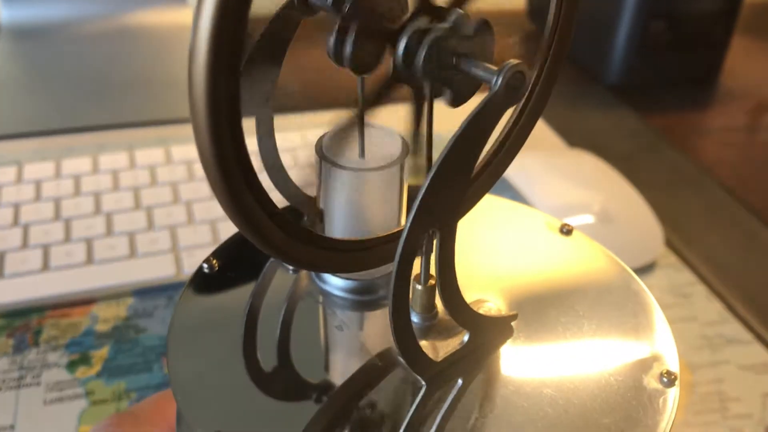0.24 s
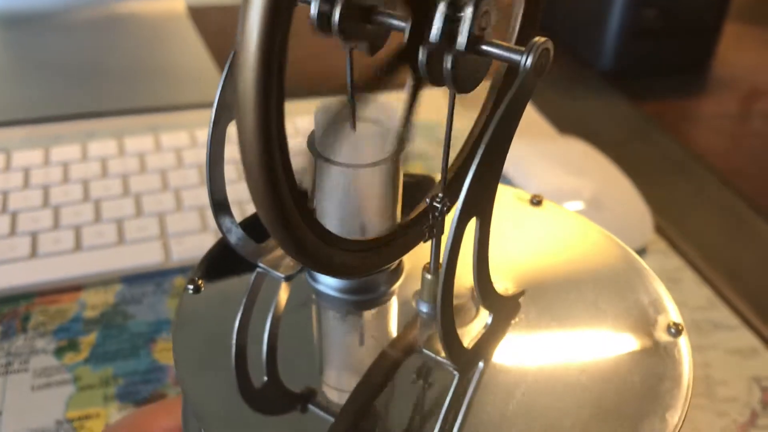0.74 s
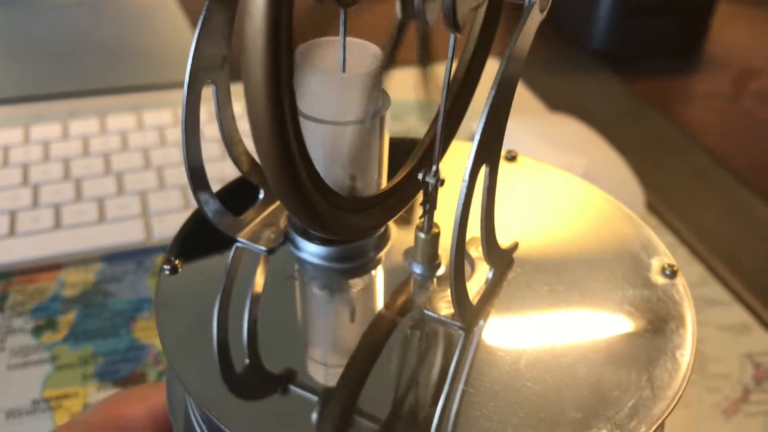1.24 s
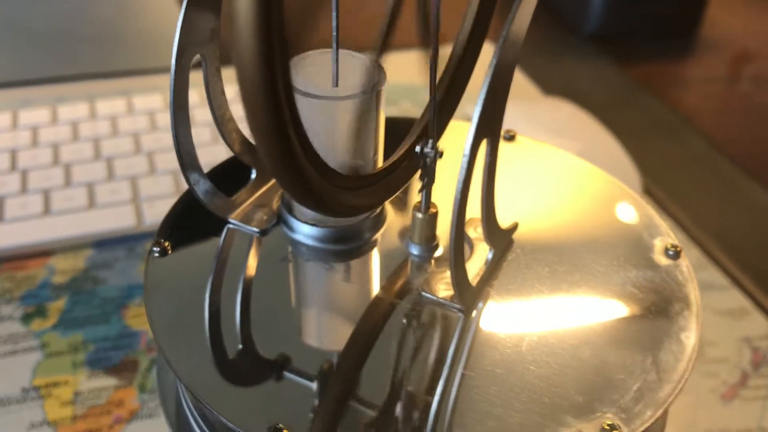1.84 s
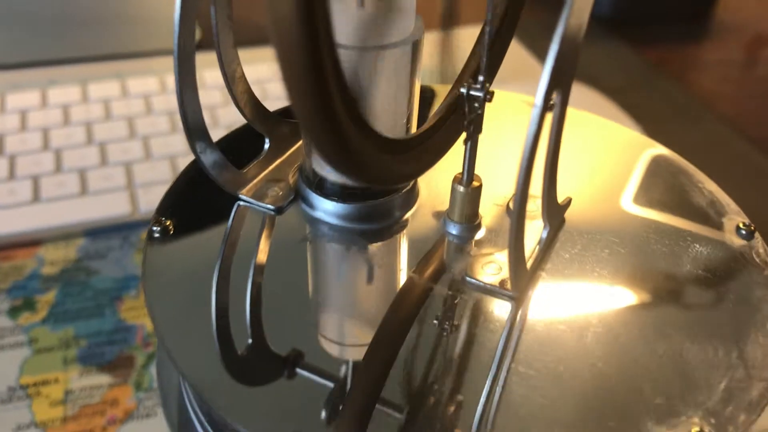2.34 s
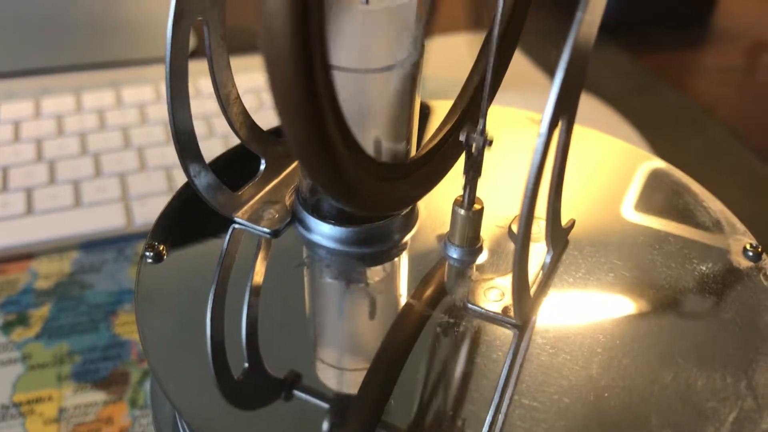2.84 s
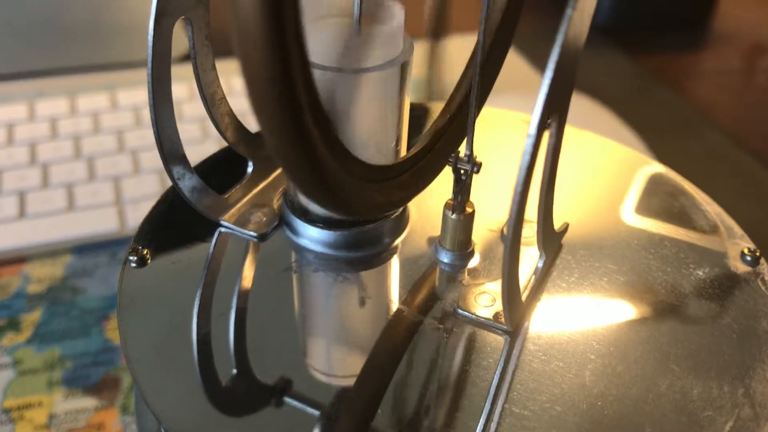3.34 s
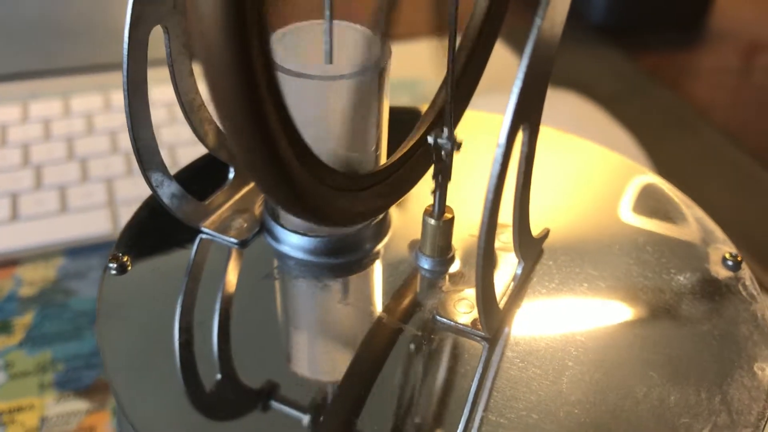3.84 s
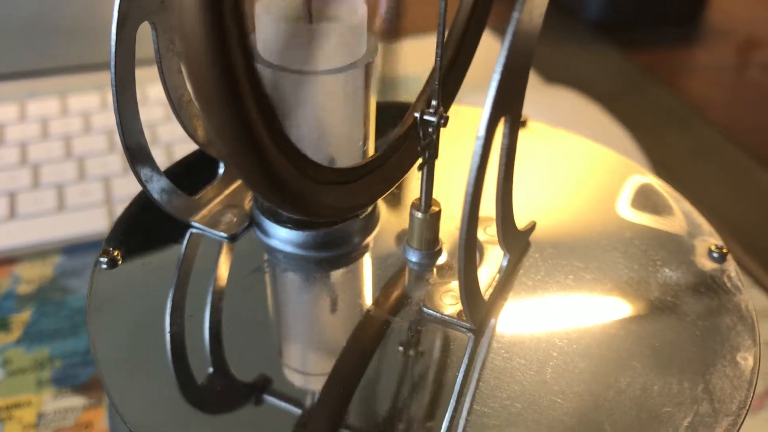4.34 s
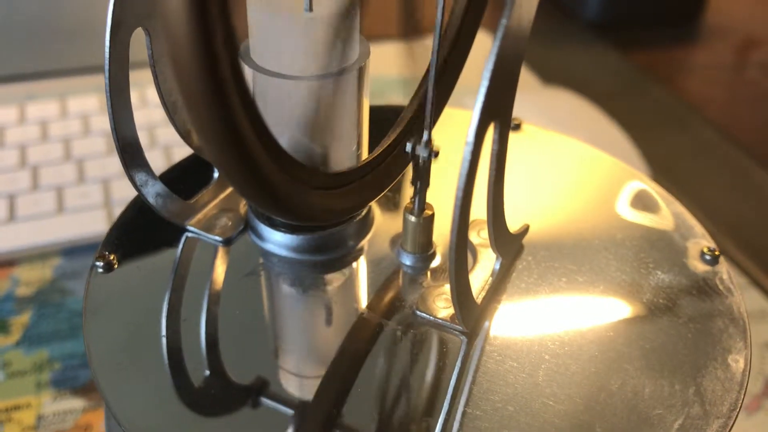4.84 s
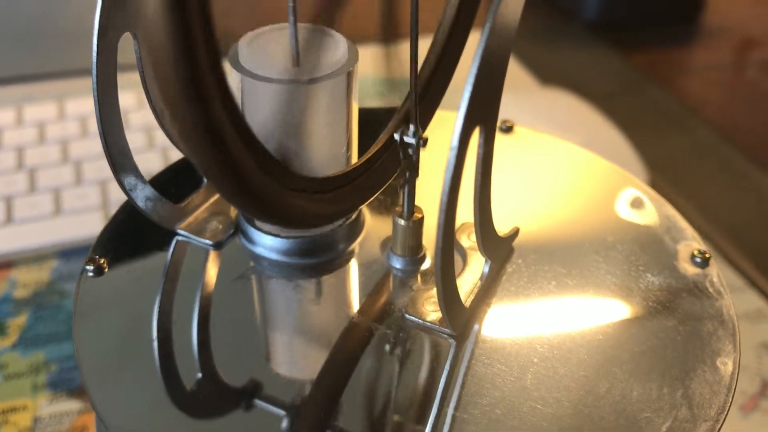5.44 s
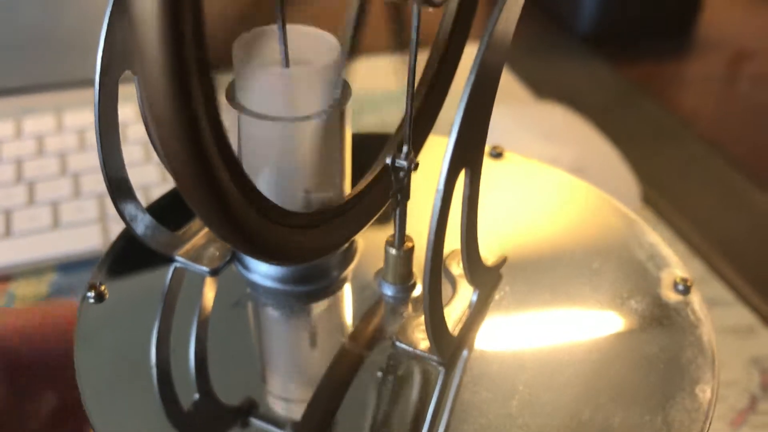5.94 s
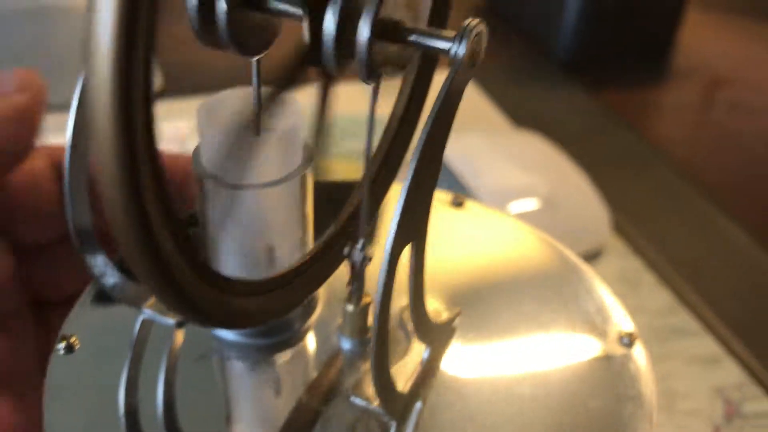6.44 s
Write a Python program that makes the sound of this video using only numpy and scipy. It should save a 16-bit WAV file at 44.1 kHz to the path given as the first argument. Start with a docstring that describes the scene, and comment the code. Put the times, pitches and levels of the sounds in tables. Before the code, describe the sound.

Steady, quick mechanical clicking from a tabletop engine with thin plates and a flywheel, heard close and dry. Each turn pairs a light tick with a louder clack, joined by short piston squeaks, thin rising slide tones and scratchy rubbing that vary from turn to turn. A faint soft tone passes after two seconds; some harder jolts follow. Quiet room hum and hiss lie beneath.

```python
"""A small hot-air engine turns two and a half times a second on a desk, close to a phone microphone.
Each turn: a bright tick, a squeak of the piston in its glass tube, a soft knock, a clack of the crank play.
Contacts are short blows with chatter; rubbing is gritty noise; squeaks and slides are unsteady tones.
Contacts and rubbing ring the thin metal plates and frame. A few dry snaps, a short soft tone just after
two seconds and some harder jolts after three seconds stand out; a faint hum and hiss fill the room."""
import sys
import numpy as np
from scipy import signal
from scipy.fft import rfft, irfft, next_fast_len
from scipy.io import wavfile
from scipy.ndimage import uniform_filter1d, map_coordinates

SR = 44100
rng = np.random.default_rng(int(sys.argv[2]) if len(sys.argv) > 2 else 0)


def natural_amplitude(level_db):
    """Convert a level in decibels to a linear amplitude factor, elementwise."""
    exponent = np.asarray(level_db, float) / 20
    return 10 ** exponent


def waveform_to_disk(signal):
    """Save audio, clipped to [-1, 1], as 16-bit WAV at the path in sys.argv[1]."""
    frames = np.transpose(np.atleast_2d(signal))
    scaled = np.clip(frames, -1, 1) * 32767
    samples = np.round(scaled).astype(np.int16)
    wavfile.write(sys.argv[1], SR, samples)


N = 294131

# The turns of the crank, each timed by the clack that ends it. Each row: clack in seconds, tick level in dB,
# slide level after the tick in dB, clack level in dB, slide level after the clack in dB; all levels relative.
TURNS = [(0.28, -32, -4, -20, -10), (0.687, -32, -1, -24.5, -2), (1.092, -33, -7, -23.5, -7),
         (1.498, -32, 0, -19, -7), (1.901, -32, -6, -20, 0.5), (2.303, -31, 2.5, -24.5, -4.5),
         (2.702, -32, 4.5, -19, 3.5), (3.102, -30, 2.5, -19, 1), (3.5, -29.5, -2, -20, -1.5),
         (3.898, -32.5, 1, -22.5, -3.5), (4.296, -34, 2.5, -23.5, 3), (4.692, -30.5, 5.5, -20, 1),
         (5.088, -32.5, -4, -19.5, 0), (5.483, -29.5, 4.5, -18.5, -2), (5.877, -28, 1, -20.5, -2),
         (6.271, -30.5, -1, -23, .6), (6.663, -33, 4, -22.5, -10)]
TICK_TURN = 0.511  # crank angle in turns after the clack: the rod pin reverses


def unit(x):
    """Scaled to rms 1."""
    return x / np.sqrt(np.mean(x ** 2) + 1e-20)


def along(points, hz):
    """Reads (Hz, value) points on a log frequency axis."""
    f, v = np.transpose(points)
    return np.interp(np.log(hz + 1), np.log(f + 1), v)


def wobble(rate):
    """A smooth random curve, rate knots a second."""
    knots = rng.standard_normal(int(N * rate / SR) + 4)
    return map_coordinates(knots, [np.arange(N) * rate / SR])


def filtered(x, response):
    """Passes x through a complex response of frequency."""
    m = next_fast_len(N + SR // 2)
    spectrum = rfft(x, m) * response(np.fft.rfftfreq(m, 1 / SR))
    return irfft(spectrum, m)[..., :N]


def coloured(x, colour):
    """Passes x through a smooth (Hz, dB) colour."""
    return filtered(x, lambda hz: natural_amplitude(along(colour, hz)))


def patchy(depth_db):
    """White noise whose strength varies in patches of pitch and time."""
    z = signal.stft(rng.standard_normal(N), nperseg=256)[2]
    field = uniform_filter1d(rng.standard_normal(z.shape), size=5, axis=0)
    field = uniform_filter1d(field, size=5, axis=1)
    return signal.istft(z * natural_amplitude(depth_db * unit(field)), nperseg=256)[1][:N]


def at_turn(angle):
    """The moment in each turn when the crank passes an angle."""
    clack_s = np.array(TURNS)[:, 0]
    start = np.r_[2 * clack_s[0] - clack_s[1], clack_s[:-1]]
    return start + angle * (clack_s - start)


def by_turn(table):
    """Columns of a table read at the crank angle, which the clacks mark."""
    s = np.array(TURNS)[:, 0]
    s = np.r_[2 * s[0] - s[1], s, 2 * s[-1] - s[-2]]  # one turn more at either end
    turn = np.interp(np.arange(N) / SR, s, np.arange(len(s))) % 1
    angle, *cols = np.transpose(table)
    return [np.interp(turn, angle, c) for c in cols]


def linkage():
    """All contacts of crank, rods and displacer: blows whose force and surfaces set level and colour."""
    # Colour of each contact. Each row: frequency in Hz, gain in dB.
    clack_colour = [(150, -5.5), (600, -7.5), (2000, -3.5), (4000, -8.5), (9000, 2.5), (15000, -9.5)]
    tick_colour = [(150, -4), (600, -12), (2000, -6.5), (4000, -10.5), (7500, 2.5), (15000, -27.5)]
    knock_colour = [(150, -10.5), (600, 6), (1500, -24.5), (3500, 0.5), (6000, 5), (15000, -2.5)]
    rattle_colour = [(150, 4.5), (600, -3), (2000, -10), (5000, -3.5), (9000, 11.5), (15000, -16)]
    jolt_colour = [(150, -0.5), (600, -2), (900, 5.5), (2000, -3.5), (5000, -11), (9000, 3.5), (15000, -17)]
    snap_colour = [(300, -8), (1500, -13.5), (5000, 1.5), (15000, 5)]
    # Now and then a joint jolts harder. Each row: start in seconds, relative level in dB, treble in dB.
    jolts = [(3.159, -38, 0.5), (3.277, -40.5, 2), (3.559, -38.5, -17), (4.068, -34.5, 0),
             (4.359, -32.5, -8)]
    # A few dry, sharp ticks. Each row: start in seconds, relative level in dB.
    snaps = [(0.6592, -30.5), (1.752, -35), (5.561, -31.5)]

    clack_s, tick_db, _, clack_db, _ = np.transpose(TURNS)
    # a heavier blow adds body, hardly treble: dB of treble lost per dB over the plain level
    dulling, clack_plain_db, tick_plain_db = 0.9, -27, -30.5
    clack_events = zip(clack_s, clack_db, dulling * (clack_plain_db - clack_db))
    tick_events = zip(at_turn(TICK_TURN), tick_db, dulling * (tick_plain_db - tick_db))
    knock_db = -45.5 + 0.5 * rng.standard_normal(len(clack_s))
    knock_events = zip(at_turn(0.906), knock_db, 0 * clack_s)  # the displacer touches down
    snap_events = [(s, db, 6) for s, db in snaps]

    clacks = contacts(clack_events, clack_colour, db=-11.5, blow_s=0.012, chatter_s=0.082,
                      chatter_db=-2.5, rise_s=0.00025, lead_s=0.004, lead_db=-24)
    ticks = contacts(tick_events, tick_colour, db=-7, blow_s=0.015, chatter_s=0.052,
                     chatter_db=3.0, rise_s=0.00024)
    knocks = contacts(knock_events, knock_colour, db=0, blow_s=0.023, chatter_s=0.1,
                      chatter_db=-13, rise_s=0.0032)
    rattles = contacts(joints(), rattle_colour, db=-12, blow_s=0.016, chatter_s=0.039,
                       chatter_db=-2.5, rise_s=0.00072)
    hard_jolts = contacts(jolts, jolt_colour, db=-13.5, blow_s=0.024, chatter_s=0.096,
                          chatter_db=-1.5, rise_s=0.0018)
    dry_snaps = contacts(snap_events, snap_colour, db=-13.5, blow_s=0.0066, chatter_s=0.023,
                         chatter_db=-4, rise_s=0.0001)
    return clacks + ticks + knocks + rattles + hard_jolts + dry_snaps


def joints():
    """Loose joints shift at fixed crank angles, a little differently on every turn."""
    # Each row: crank angle in turns, relative level in dB, treble in dB, scatter of both levels in dB,
    # timing scatter in seconds.
    joint_rows = [(.146, -43, -4, 2.5, .002), (.833, -39, -1, 1.8, .0015), (.43, -53, -1, 3, .006)]
    rows = []
    for angle, db, treble_db, scatter_db, scatter_s in joint_rows:
        luck = rng.standard_normal((len(TURNS), 3))
        for s, (a, b, c) in zip(at_turn(angle), luck):
            if s > 0.01:
                rows.append((s + scatter_s * a, db + scatter_db * b, treble_db + scatter_db * c))
    return rows


def contacts(events, colour, db, blow_s, chatter_s, chatter_db, rise_s, lead_s=0, lead_db=-120):
    """A short blow, chatter as the parts settle (each falls 60 dB in its time), and a touch just ahead."""
    out, t = np.zeros(N + SR), np.arange(SR // 8) / SR
    push = 2.59 * np.exp(-((t - 0.0003) / 0.000084) ** 2)  # the contact force itself, one smooth pulse
    for s, peak_db, treble_db, *_ in events:
        a, b, c = rng.standard_normal((3, len(t)))
        grit = b * natural_amplitude(2.77 * np.repeat(c, 64)[:len(t)])  # chatter comes in millisecond lumps
        blow = a * natural_amplitude(-60 * t / blow_s)
        chatter = grit * natural_amplitude(chatter_db - 60 * t / chatter_s)
        hit = push + (blow + chatter) * (1 - np.exp(-t / rise_s))
        treble = hit - uniform_filter1d(hit, size=9)
        hit += (natural_amplitude(treble_db) - 1) * treble
        start = round(s * SR)
        out[start:][:len(t)] += natural_amplitude(peak_db + db) * hit
        touch = uniform_filter1d(c, size=2) - uniform_filter1d(c, size=9)
        touch = touch * natural_amplitude(-60 * t / 0.014)
        touch_start = max(round((s - lead_s) * SR), 0)
        out[touch_start:][:len(t)] += natural_amplitude(peak_db + lead_db) * touch
    return coloured(out[:N], colour)


def body(f):
    """Direct sound plus the ringing plates and frame; a small object sends out no deep bass."""
    # Modes of plates and frame. Each row: frequency in Hz, width in Hz, level over the direct sound in dB.
    mode_rows = [(129, 4.1, 17), (172.2, 12.6, 14.5), (240.8, 17.7, 20.5), (293.2, 27.7, 18),
                 (542.5, 30, 18.5), (627, 55.6, 20), (715, 26.4, 21), (849, 52, 11.5), (1024, 122, 5.5),
                 (1538, 114, 13), (2580, 1450, 5), (2490, 114, 22), (2657, 41, 18), (2675, 35, 13.5),
                 (3194, 57, 10.5), (4560, 35, 11), (5580, 70, 11), (7087, 45, 12), (8311, 12, 16.5),
                 (8473, 16, 17), (9858, 30, 11), (11400, 286, 13.5), (14850, 980, 11.5)]
    modes = 0
    for k, (centre, width, db) in enumerate(mode_rows):
        damping = 1j * f * width
        modes = modes + (-1) ** k * natural_amplitude(db) * damping / (centre * centre - f * f + damping)
    bass_loss = (1j * f / (100 + 1j * f)) ** 2
    return (1 + modes) * bass_loss


def squeak():
    """Stick-slip keeps two high tube modes singing, mostly on the stroke after the tick."""
    # Each row: low mode in seconds, its half length in ms, its level in dB, delay of the high mode in ms,
    # high mode level in dB.
    squeak_rows = [(0.148, 19.3, -36.5, 35.5, -49), (0.542, 10.5, -39.5, 32.5, -59.5),
                   (0.948, 13.7, -42.5, 10.5, -53.5), (1.355, 14.3, -42, 38.5, -41),
                   (1.448, 12, -48, 2, -52), (1.777, 8.8, -32, 18.5, -35), (2.171, 12.5, -36, 7.5, -46),
                   (2.236, 5.7, -42, -2, -34), (2.572, 17.7, -39.5, 26, -37), (2.974, 15.5, -40, 19, -42.5),
                   (3.369, 14.6, -39.5, 30.5, -40.5), (3.764, 18.7, -41, 23, -44),
                   (4.165, 14, -38.5, 30.5, -40), (4.566, 22, -40.5, 29.5, -38.5),
                   (4.962, 13.4, -33.5, 29, -36), (5.36, 17, -33.5, 16, -38),
                   (5.435, 7.8, -45.5, -3.5, -42.5), (5.735, 10.3, -37.5, 42.5, -39),
                   (6.162, 15, -41.5, 22, -35.5), (6.538, 25, -39, 32.5, -41)]
    low, high = [], []
    for s, ms, low_db, later_ms, high_db in squeak_rows:
        top_s = s + later_ms / 1000
        low.append((s, 5591, low_db, ms))
        low.append((s + 0.038, 5730, low_db - 16, 17))  # the low mode trails off
        high.append((top_s, 11425, high_db, 9.1))
        high.append((top_s - 0.0346, 11290, high_db - 10, 7))  # the high mode catches faintly first
        high.append((top_s + 0.016, 11700, high_db - 14.5, 11))  # and thins out a little sharper
    low_mode = singing(low, climb=0.005, drift=0.004, flutter_db=1.5, lump_db=3.5, rough=0.15)
    high_mode = singing(high, climb=0.009, drift=0.007, flutter_db=2, lump_db=4.5, rough=0.2)
    return low_mode + high_mode


def singing(swells, climb, drift, flutter_db, lump_db, rough):
    """One mode in swells (s, Hz, dB, half length ms); pitch climbs through each, the grip comes in lumps."""
    t, level, pitch = np.arange(N) / SR, np.full(N, 1e-9), np.zeros(N)
    for s, hz, db, ms in swells:
        near = slice(max(int((s - 0.12) * SR), 0), int((s + 0.12) * SR))
        u = (t[near] - s) * 1000 / ms
        swell = natural_amplitude(db) * np.exp(-u * u / 2)
        level[near] += swell
        pitch[near] += swell * hz * (1 + climb * np.tanh(u))  # averaged by level where swells overlap
    grip = natural_amplitude(lump_db * np.minimum(1.4 * wobble(105), 0.6))
    return level * grip * tone(pitch / level, drift, flutter_db, rough)


def tone(hz, drift, flutter_db, rough):
    """A sine of rms near 1, unsteady in pitch and strength, with a ragged fringe."""
    phase = 2 * np.pi * np.cumsum(hz * (1 + drift * wobble(120))) / SR
    fringe = rough * (wobble(900) * np.sin(phase) + wobble(900) * np.cos(phase))
    return np.sqrt(2) * natural_amplitude(flutter_db * wobble(160)) * (np.sin(phase) + fringe)


def slide():
    """A low tube mode sings and climbs along each stroke, with a rasp above it; stronger on some strokes."""
    # Each row: crank angle in turns (0 is the clack), frequency in Hz, tone level in dB, rasp level in dB;
    # both levels relative to the stroke.
    glide_rows = [(0, 2540, -90, -80), (.04, 2560, -59, -72), (.12, 2660, -54, -73), (.15, 2680, -56, -75),
                  (.175, 2680, -90, -85), (.51, 2520, -90, -85), (.55, 2540, -59, -65),
                  (.68, 2610, -61, -62), (.78, 2670, -58, -62), (.825, 2690, -62, -65),
                  (.85, 2690, -90, -75)]
    hz, db, rasp_db = by_turn(glide_rows)
    clack_s, _, out_db, _, back_db = np.transpose(TURNS)
    stroke_s = np.c_[at_turn(TICK_TURN), clack_s].ravel()
    stroke_db = np.c_[out_db, back_db].ravel()
    stroke = np.searchsorted(stroke_s, np.arange(N) / SR) - 1
    held = stroke_db[np.clip(stroke, 0, None)]
    song = natural_amplitude(db + held) * tone(hz, 0.00406, 5.33, 0.16)
    rasp_hz = 2994 * (1 + 0.017 * wobble(30))
    rasp_level = natural_amplitude(rasp_db + 0.57 * held + 5.1 * wobble(55))
    return song + rasp_level * tone(rasp_hz, 0.0201, 2.2, 0.38)


def rubbing():
    """Bearings and seals rub: uneven, gritty friction noise that follows the crank, through the body."""
    # Each row: crank angle in turns, dull rub in dB, bright rub in dB; both relative levels.
    rub_rows = [(0, -41.5, -39), (.08, -52.5, -67), (0.148, -47.5, -57.5), (.19, -67, -87), (.3, -60, -92),
                (.42, -58.5, -93), (0.491, -58.5, -60.5), (0.541, -42.5, -51), (.65, -59, -53),
                (.76, -55, -52), (.82, -60, -66.5), (.9, -61, -53.5), (1, -105.5, -83)]
    # Colour of the dull and the bright rub. Each row: frequency in Hz, gain in dB.
    dull = [(150, -11), (600, 2.5), (1200, -9), (3000, -23)]
    bright = [(800, -21), (2500, -10), (6500, 1), (15000, -11.5)]
    grains_per_s, grain_db = 160, 16.5  # grit that catches under the rubbing
    sound = 0
    for level_db, colour, lump_db, patch_db in zip(by_turn(rub_rows), (dull, bright), (2.5, 3), (1.5, 4)):
        caught = rng.random(N) < grains_per_s / SR
        grit = caught * rng.standard_normal(N) * natural_amplitude(grain_db)
        unevenness = natural_amplitude(lump_db * wobble(60) + 1.9 * wobble(6))
        noise = (patchy(patch_db) + grit) * unevenness
        sound = sound + filtered(coloured(noise * natural_amplitude(level_db), colour), body) * natural_amplitude(-7)
    return sound


def whistle():
    """One brief soft tone, a sine that rises in pitch as it swells and fades."""
    # Each row: time in seconds, frequency in Hz, level in dB.
    whistle_rows = [(2.35, 900, -72), (2.372, 923, -59), (2.392, 930, -49), (2.42, 933, -69),
                    (2.47, 943, -91)]
    s, hz, db = np.transpose(whistle_rows)
    t = np.arange(N) / SR
    phase = 2 * np.pi * np.cumsum(np.interp(t, s, hz)) / SR
    return np.sqrt(2) * natural_amplitude(np.interp(t, s, db, -120, -120)) * np.sin(phase)


def room(x):
    """Each frequency of the room's answer, a decaying noise, dies at its own speed."""
    # Each row: frequency in Hz, time to fall 60 dB in seconds.
    decay_rows = [(200, 0.23), (2000, 0.2), (12000, 0.039)]
    _, t, z = signal.stft(rng.standard_normal(SR // 2), SR, nperseg=256)
    hz = np.fft.rfftfreq(256, 1 / SR)
    tail = signal.istft(z * natural_amplitude(-60 * t / along(decay_rows, hz)[:, None]), SR, nperseg=256)[1]
    delayed = np.pad(x, (300, 0))  # samples before the room answers
    return signal.fftconvolve(delayed, tail / np.linalg.norm(tail))[:N]


def background():
    """A wavering hum over the room's hiss, noise whose treble slowly comes and goes."""
    # Colour of the hiss. Each row: frequency in Hz, relative level in dB per Hz.
    air = [(21, -38), (35, -12), (136, -6), (301, -18), (587, -13), (979, -21), (2460, -22.5), (5180, -29),
           (6690, -26), (14800, -42.5), (16000, -23.5)]
    # Treble of the hiss. Each row: time in seconds, relative level in dB.
    air_treble = [(0.0, -75), (0.33, -70), (1.32, -77), (1.49, -68.5), (4.23, -68), (4.33, -70.5),
                  (5.72, -60), (6.52, -74), (6.67, -66)]
    hum_hz = 124 * (1 + 0.0262 * wobble(14))
    hum_level = natural_amplitude(-69.5 + 3.7 * wobble(17)) * np.sqrt(2)
    hum = hum_level * np.sin(2 * np.pi * np.cumsum(hum_hz) / SR)
    hiss = natural_amplitude(-64.0 + 1.5 * wobble(3)) * unit(coloured(rng.standard_normal(N), air))
    treble = unit(coloured(patchy(3.7), [(2500, -17), (5000, -6.5), (9000, -6), (15000, -6)]))
    treble_db = np.interp(np.arange(N) / SR, *np.transpose(air_treble))
    return hum + hiss + natural_amplitude(treble_db - 4.5) * treble


def scene():
    """The engine close by, the room's answer to it and the background."""
    engine = filtered(linkage(), body) + rubbing() + squeak() + slide() + whistle()
    return (engine + natural_amplitude(-14) * room(engine) + background())[None]


def top_cut(x):
    """Nothing passes above the cut-off."""
    return signal.sosfilt(signal.butter(12, 16680, fs=SR, output="sos"), x)


def record(dry):
    """The phone rolls off steeply towards the end of the top octave."""
    top_hz = 15500
    finished = filtered(dry, lambda hz: 1 / (1 + (hz / top_hz) ** 40))
    return top_cut(finished)


dry = scene()
out = record(dry)
waveform_to_disk(out)
```